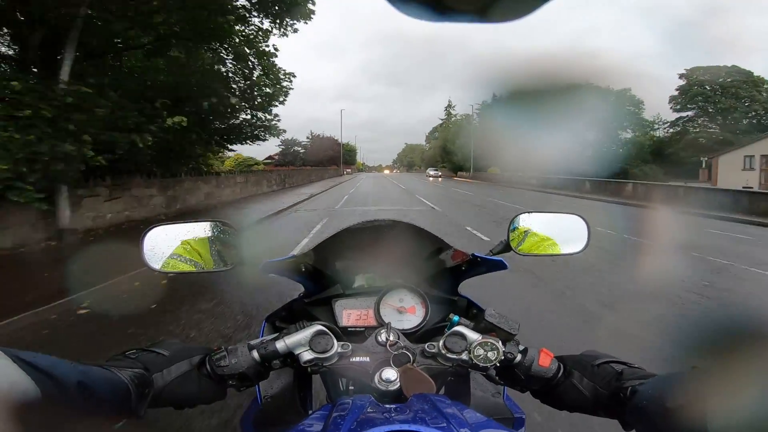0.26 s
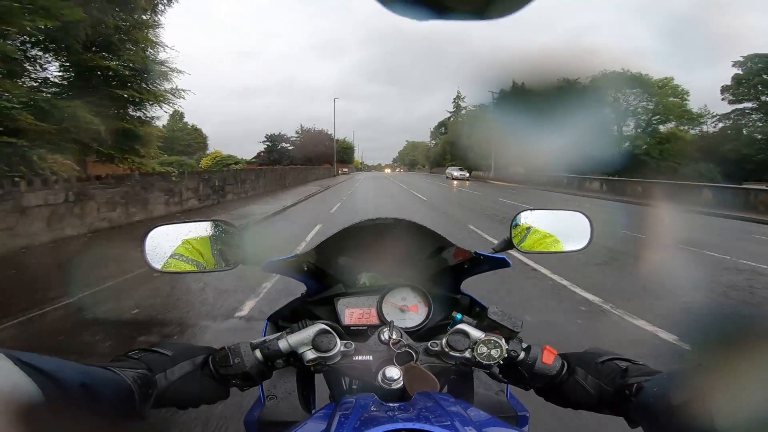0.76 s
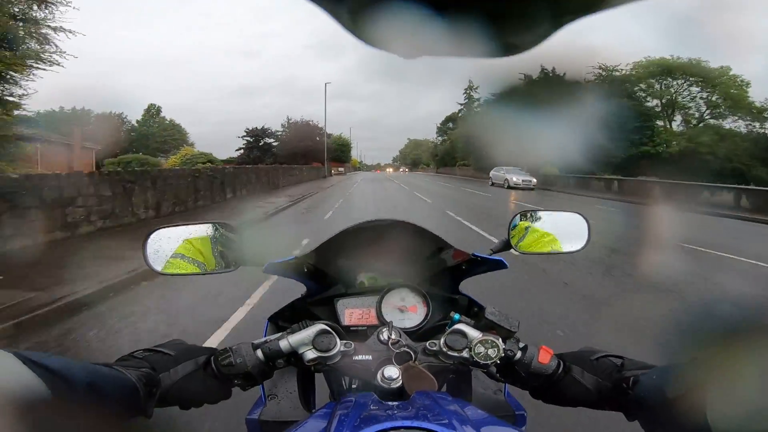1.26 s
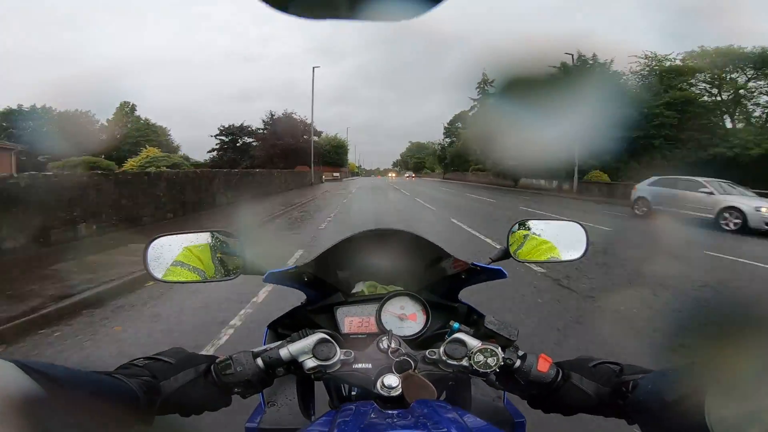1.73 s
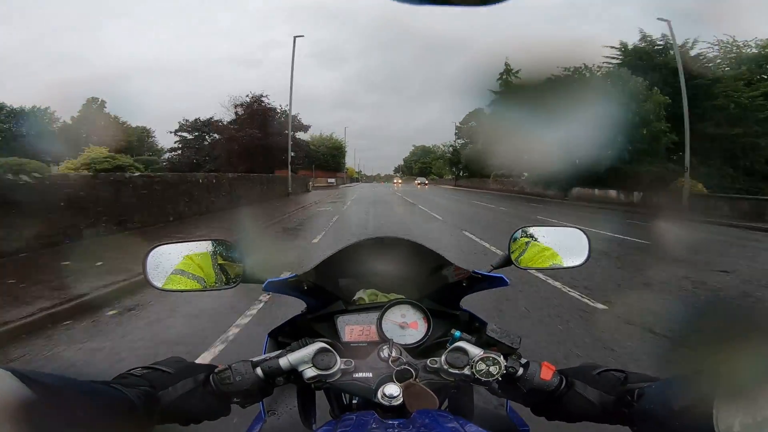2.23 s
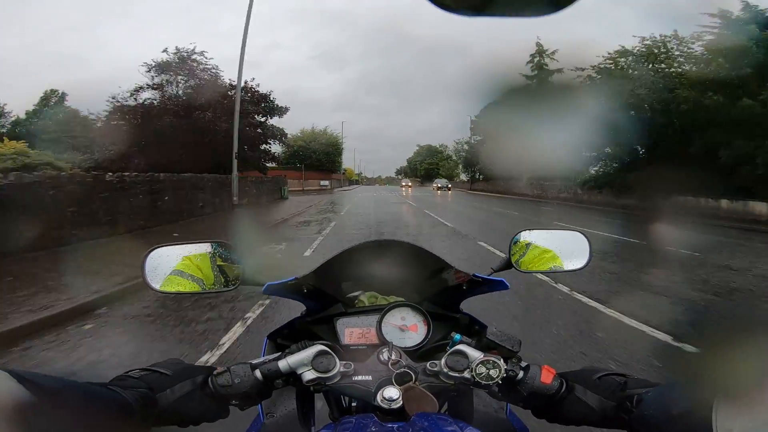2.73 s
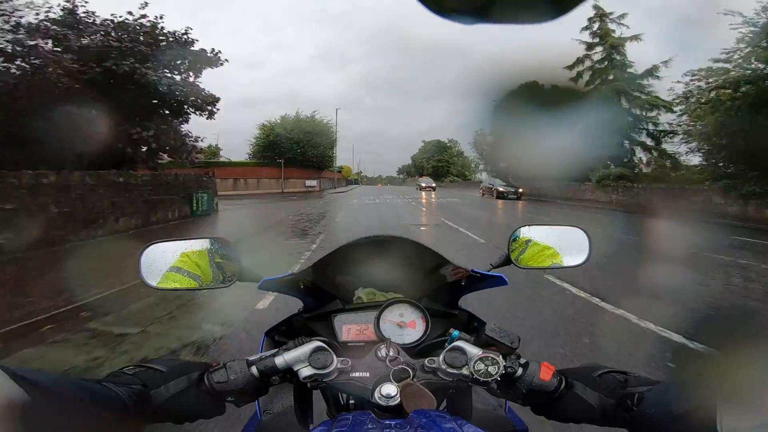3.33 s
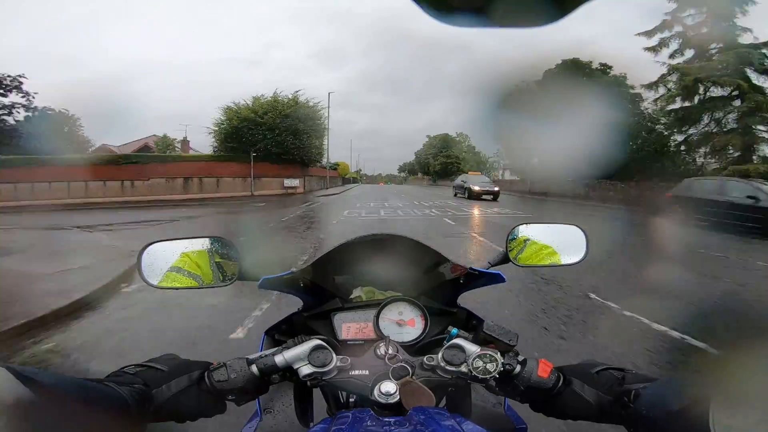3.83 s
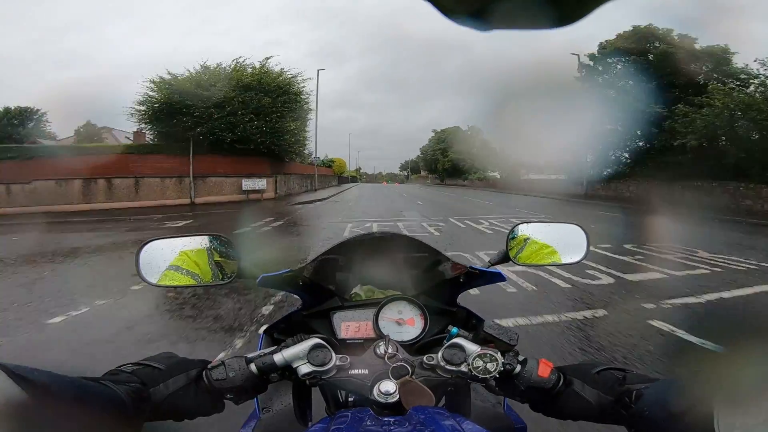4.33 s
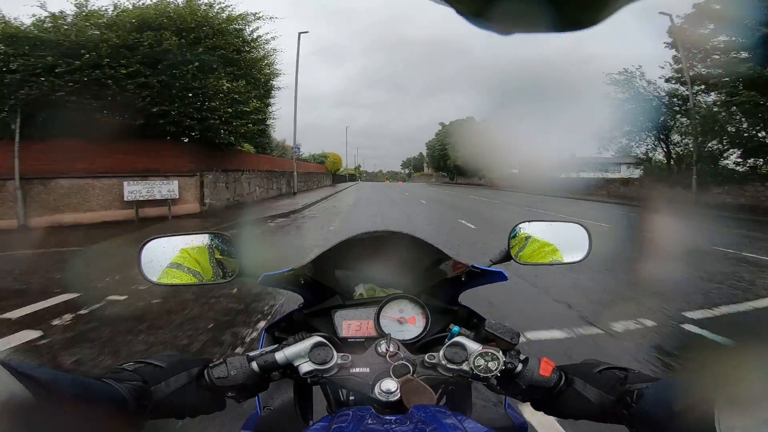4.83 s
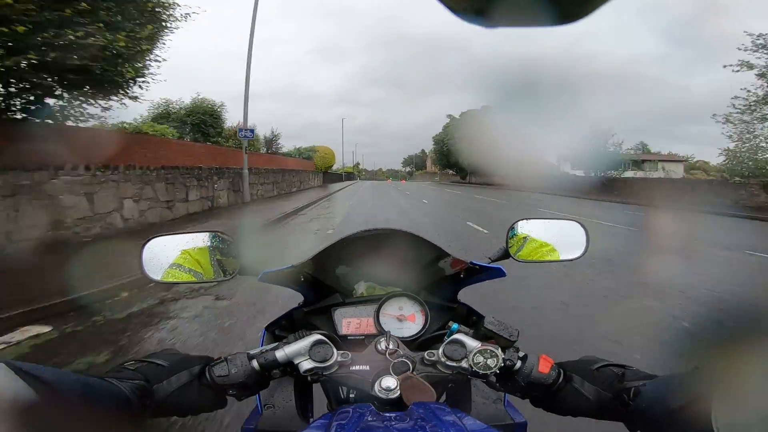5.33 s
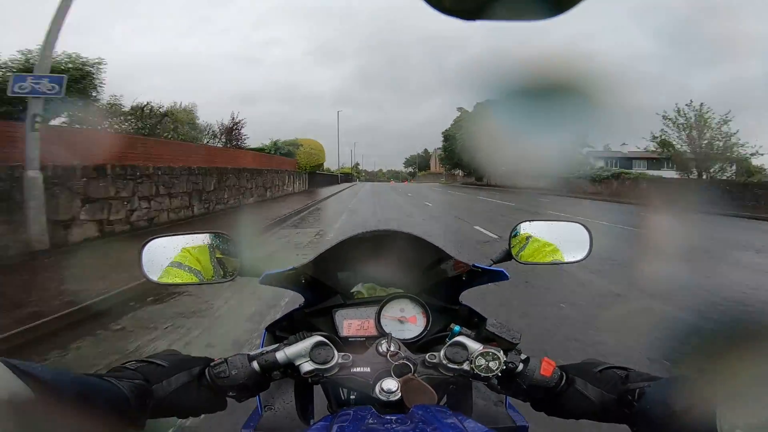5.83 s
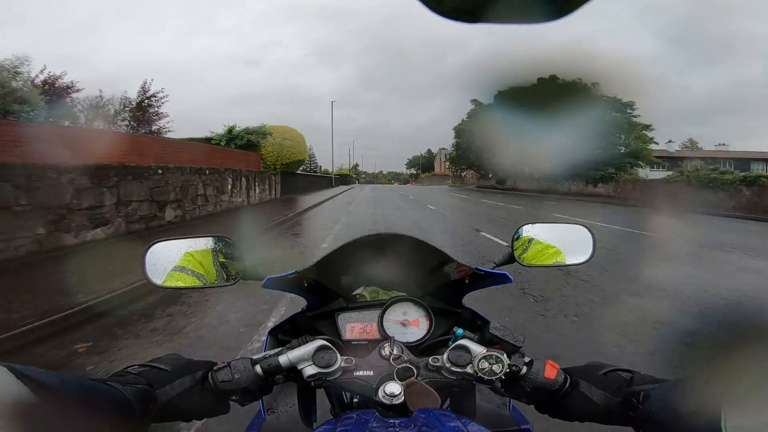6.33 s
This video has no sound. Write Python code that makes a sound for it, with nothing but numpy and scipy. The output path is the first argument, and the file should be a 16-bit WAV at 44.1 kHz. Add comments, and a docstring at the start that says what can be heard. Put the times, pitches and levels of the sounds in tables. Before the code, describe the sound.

A motorcycle cruises along a wet road under gusty wind buffeting, with spray, a few raindrop ticks and cars swishing past.

```python
"""Wind thumps and tears at a microphone on a rider's chest, over a motorcycle's throb and wet tyre hiss.
The windscreen sheds the eddies: gusts, sharp slaps, rasping jets and, now and then, a deep boom.
Underneath, the single cylinder fires a little slower as the bike loses speed. Water sizzles over the
microphone port, a few raindrops tick on the camera, and three oncoming cars swish past."""
import sys
import numpy as np
from scipy import signal
from scipy.fft import rfft, irfft, next_fast_len
from scipy.io import wavfile
from scipy.ndimage import uniform_filter1d, map_coordinates

SR = 44100
rng = np.random.default_rng(int(sys.argv[2]) if len(sys.argv) > 2 else 0)


def to_wav(s):
    """Save 16-bit WAV."""
    ch = np.atleast_2d(s).T  # columns
    pcm = np.round(np.clip(ch, -1, 1) * 32767)  # PCM
    wavfile.write(sys.argv[1], SR, pcm.astype(np.int16))


N = 290178
T = np.arange(N) / SR

# Cue levels are faders, set ahead of each layer's trim and filters.
# gusts spilling over the screen: t/s, length/s, buffet level/dB, tear level/dB, swell level/dB
GUST_CUES = [(0.005, 0.13, -15, -25, -20.5), (0.154, 0.11, -15.5, -44, -27), (0.28, 0.034, -14, -41, -35),
             (0.363, 0.088, -18, -29.5, -30), (0.463, 0.11, -13.5, -26, -24), (0.572, 0.033, -13, -25, -29),
             (0.618, 0.14, -15.5, -23, -23), (0.763, 0.029, -13, -24.5, -26), (0.821, 0.03, -10, -25, -29),
             (0.943, 0.044, -11, -27, -35), (1.01, 0.087, -12, -21.5, -36), (1.136, 0.053, -16.5, -30, -47),
             (1.358, 0.052, -16, -30, -33), (1.469, 0.15, -15, -30, -21), (2.066, 0.021, -10, -25, -46),
             (2.139, 0.047, -10.5, -35, -31), (2.26, 0.042, -15, -26, -39), (2.329, 0.099, -18, -30.5, -27),
             (2.497, 0.093, -14.5, -26, -21), (2.635, 0.041, -13, -33, -39),
             (2.729, 0.059, -16, -26.5, -39), (2.805, 0.022, -13, -36, -30),
             (2.852, 0.042, -16, -25.5, -20), (2.974, 0.067, -20, -30.5, -27), (3.085, 0.1, -16, -22, -22),
             (3.232, 0.023, -14, -22.5, -12), (3.283, 0.02, -15.5, -31, -32),
             (3.354, 0.054, -17.5, -33, -19), (3.464, 0.053, -16.5, -38, -30), (3.78, 0.06, -18, -31, -32),
             (3.883, 0.17, -14.5, -30, -29), (4.051, 0.045, -21, -23.5, -28),
             (4.151, 0.27, -16, -27.5, -21), (4.596, 0.084, -13.5, -35, -24), (4.752, 0.027, -11, -46, -45),
             (4.8, 0.035, -17, -34, -30), (4.842, 0.029, -18, -22, -21), (4.94, 0.076, -19.5, -41, -32),
             (5.019, 0.062, -16, -22.5, -31), (5.087, 0.12, -17.5, -25.5, -31),
             (5.223, 0.031, -14, -22, -26), (5.299, 0.084, -14.5, -23.5, -25),
             (5.385, 0.098, -22.5, -25, -29), (5.5, 0.14, -18.5, -32, -19.5),
             (5.647, 0.062, -18.5, -34, -23), (5.725, 0.096, -16, -26.5, -36),
             (5.84, 0.067, -15.5, -25, -19), (5.993, 0.033, -19, -39, -41), (6.08, 0.056, -22.5, -21, -25),
             (6.194, 0.19, -22.5, -30, -43), (6.378, 0.13, -23, -27.5, -38), (6.492, 0.12, -22, -24.5, -33)]
# wind bed between gusts, lowest in the screen's shelter: t/s, level/dB
CALM_FADER = [(0, -0.5), (1.1, -2), (1.25, -2), (1.65, -7), (2.02, -6.5), (2.25, 1), (3.45, -4.5),
              (3.65, -3), (3.85, -2.5), (4.4, -1), (4.52, -0.5), (4.7, -4), (5.9, 0), (6.58, -1.5)]
# tone of the wind's thumping buffet, slow pressure swell and fine tearing: f/Hz, level/dB
BUFFET_EQ = [(30, -9.5), (55, -0.5), (80, -1), (125, -0.5), (190, -5), (290, -12), (450, -20), (900, -34.5),
             (2500, -63)]
SWELL_EQ = [(10, -21.5), (24, 1), (38, 17.5), (55, 11), (80, 5.5), (160, -55), (600, -120)]
TEAR_EQ = [(120, -15), (280, -1), (420, 2), (650, -3), (1100, -6), (1600, -25), (2500, -20), (4000, -37),
           (8000, -70.5), (14000, -100)]
# four-stroke firing rate: t/s, f/Hz
FIRING_RATE = [(0, 37.7), (1.1, 37.5), (1.8, 37.25), (2.4, 36.6), (3.1, 36.1), (3.7, 35.7), (4.7, 35.15),
               (5.4, 34.7), (6, 34.3), (6.58, 34.35)]
# exhaust note at the highest and the lowest revs: multiple of the firing rate, level/dB
ORDERS_FAST = [(1, -12), (2, 3), (3, -7), (4, -15), (5, -3.5), (6, -13), (7, -17.5), (8, -30), (9, -16),
               (10, -13.5), (11, -22), (12, -19.5), (13, -25)]
ORDERS_SLOW = [(1, -9.5), (2, -0.5), (3, -6.5), (4, -0.5), (5, -4), (6, -4.5), (7, -5), (8, -14), (9, -21),
               (10, -10.5), (11, -18.5), (12, -17.5), (13, -20)]
# rides on the engine, the tyre roar and the spray (up where the road is wetter): t/s, level/dB
ENGINE_FADER = [(0, -23), (1.8, -22.5), (3.6, -24), (4.6, -23), (6.58, -21.5)]
ROAR_FADER = [(0, -31.5), (0.9, -32), (1.25, -34), (2, -31), (2.8, -29), (3.2, -27.5), (4.3, -26.5),
              (5.55, -31.5), (6.45, -27)]
SPRAY_FADER = [(0, -44.5), (0.35, -46), (0.75, -46.5), (1.3, -46.5), (1.7, -44.5), (2.02, -44), (2.25, -46),
               (2.8, -45.5), (3.2, -44), (3.55, -45), (4.2, -44), (4.55, -45.5), (5.3, -45), (5.75, -45.5),
               (6.1, -45), (6.38, -42), (6.58, -44)]
# tone of the bike's tread and of its spray: f/Hz, level/dB
ROAR_EQ = [(100, -0.5), (300, 0), (550, -2.5), (780, 3), (1150, 2), (1370, -0.5), (1550, -8), (2300, -10),
           (3300, -18), (4000, -32), (7000, -61), (12000, -120)]
SPRAY_EQ = [(1500, -4), (3300, 6), (3900, -1.5), (4600, 1.5), (4900, -1.5), (5220, 4), (5500, -1),
            (5850, -3.5), (6250, -3.5), (6700, -6.5), (8100, -6), (8900, -18.5), (9900, -23), (10400, -22),
            (11500, -30.5), (14000, -41)]
# early reflections off nearby surfaces: delay/s, level/dB
REFLECTIONS = [(.0034, -43), (.0049, -44), (.0076, -24.5), (0.0102, -20)]
# water creeping over the microphone port: t/s, level/dB, half length/s, f/Hz, glide/(Hz/s)
FILM_CUES = [(0.08, -55, 0.19, 8800, -3000), (0.07, -49.5, 0.15, 7000, 5999), (0.3, -53, 0.16, 5700, -3500),
             (1.2, -58, 0.037, 8100, -2000), (3.2, -56, 0.07, 8300, -4000)]
# single vortices hitting the microphone: t/s, level/dB, core passing time/s
SLAP_CUES = [(0.1233, -7, 0.00064), (.202, -6.5, .0012), (.247, -9, 0.0013), (.386, -10, .00035),
             (0.4105, -7, .0006), (.475, -13, .0004), (0.4875, -10, .0006), (.535, -8.5, 0.0014),
             (.547, -9.5, 0.00053), (0.5865, -8, 0.0005), (0.6383, -8.5, 0.00058), (.6871, -13, .0005),
             (.6945, -9, 0.00041), (0.721, -11, 0.00089), (0.7341, -10, 0.00055), (.779, -9.5, 0.00081),
             (0.9679, -6, 0.00057), (0.9795, -4.5, 0.00086), (1.0104, -5, 0.00056), (1.0267, -9.5, .0007),
             (1.0666, -15, 0.00063), (1.0834, -8, 0.00068), (1.0917, -1, .0009), (1.165, -12, 0.0012),
             (1.5296, -8, 0.00041), (1.5438, -8.5, 0.00042), (1.5781, -10.5, 0.00084), (1.617, -8.5, 0.002),
             (2.0815, -7.5, 0.0012), (2.09, -2.5, 0.0016), (2.0965, -2.5, 0.0015), (2.1507, -10, 0.00049),
             (2.1798, -4, 0.00059), (2.259, -6, 0.00043), (2.36, -13, .0014), (2.461, -8.5, 0.001),
             (2.5021, -8, 0.00042), (2.516, -12, 0.0003), (2.537, -7, 0.0015), (2.646, -9, .0015),
             (2.7465, -11, 0.0004), (2.772, -6.5, .0012), (2.869, -9.5, 0.0012), (2.896, -7.5, 0.0013),
             (3.0717, -10.5, 0.00035), (3.138, -11, 0.00077), (3.243, -9, 0.0014), (3.301, -7, 0.0016),
             (3.363, -9, 0.0015), (3.3908, -5.5, 0.00044), (3.466, -8, 0.0014), (3.5094, -6, 0.00084),
             (3.703, -6.5, 0.0019), (3.7573, -5, 0.00048), (3.829, -10, .0011), (3.912, -6.5, .001),
             (3.937, -10.5, .001), (4.0007, -8.5, 0.00044), (4.025, -8, 0.0013), (4.0492, -5, 0.00032),
             (4.061, -10, 0.0013), (4.21, -13, 0.001), (4.262, -8.5, .0012), (4.355, -10, 0.0012),
             (4.675, -6, .0013), (4.754, -8.5, 0.0013), (4.828, -11, 0.0013), (4.9678, -10, 0.00061),
             (5.0141, -5.5, 0.00037), (5.0217, -15, 0.00048), (5.052, -11, 0.0007), (5.127, -10, .0013),
             (5.1605, -13, 0.0008), (5.3047, -11, 0.00086), (5.3272, -9, 0.00079), (5.3525, -8.5, 0.00048),
             (5.3944, -8, 0.00035), (5.454, -10, 0.00061), (5.518, -9, 0.0011), (5.554, -11.5, 0.00095),
             (5.5956, -8.5, 0.00078), (5.664, -7, 0.00097), (5.79, -7.5, 0.0013), (5.9993, -12.5, 0.00061)]
# raindrops on the camera: t/s, level/dB, f/Hz
DROP_CUES = [(0.275, -15.5, 2450), (.276, -21.5, 4600), (.277, -31, 8000), (.7075, -18, 2000),
             (.7085, -22, 3880), (1.067, -25, 3830), (1.1452, -23, 7960), (1.1798, -33, 7000),
             (1.6897, -36, 8200), (1.861, -16.5, 2280), (2.4983, -34, 7500), (3.1883, -16.5, 7300),
             (3.3264, -17.5, 4200), (4.2416, -22, 7400), (4.3127, -34, 8000), (4.4483, -26, 8160),
             (4.868, -22, 4130), (6.0253, -21.5, 6900)]
# fast jets across the microphone: t/s, level/dB, half length/s, centre f/Hz
RASP_CUES = [(0.483, -26, 0.029, 850), (0.589, -26.5, 0.0067, 1400), (0.642, -32, 0.035, 800),
             (0.696, -25, 0.019, 900), (0.875, -34, 0.07, 1400), (1.033, -32, 0.0096, 900),
             (1.068, -29, 0.02, 1300), (1.179, -25, 0.0083, 1350), (1.531, -25, 0.0046, 1000),
             (1.545, -24, 0.009, 1040), (3.135, -28, 0.026, 750), (4.035, -34, 0.037, 900),
             (4.194, -27.5, 0.025, 840), (4.447, -29.5, .009, 2100), (5.014, -24, .006, 940),
             (5.047, -26, .02, 880), (5.155, -31.5, 0.078, 780), (5.414, -28, 0.012, 950)]
# spells of deep vortices: t/s, level/dB, half length/s
BOOM_CUES = [(1.038, -19, 0.08), (2.223, -18.5, 0.11), (3.2, -22, 0.29), (5.174, -18, 0.35),
             (5.7, -22.5, 0.078)]
# oncoming cars at their loudest: t/s, level/dB, half length/s
CAR_CUES = [(1.914, -37, 0.48), (3.78, -32, 0.26), (4.4, -46, 0.29)]
# tone of their wet tyres: f/Hz, level/dB
CAR_EQ = [(200, -6), (900, 0.5), (1300, 0.5), (1700, 2.5), (2500, -1), (3300, -11.5), (4200, -18.5),
          (8000, -26), (14000, -85)]
# tone of the saturated eddies, engine clatter, vortex wakes and booms: f/Hz, level/dB
EDDY_EQ = [(20, -13.5), (50, -2.5), (500, -1.5), (1200, -24.5), (4000, -59), (9000, -120)]
CLATTER_EQ = [(300, -19.5), (800, -3.5), (1300, -1), (2600, -5), (5000, -28.5), (10000, -57.5)]
WAKE_EQ = [(150, -7.5), (400, 0.5), (1000, -3), (1500, -14.5), (2500, -22), (5000, -46.5)]
BOOM_EQ = [(40, -29.5), (70, -7), (88, -3), (105, -5), (135, -21.5), (300, -71), (800, -120)]


def amp(db):
    """Decibels to gain."""
    return 10 ** (np.asarray(db) / 20)


def unit(x):
    """Normalise to rms 1."""
    return x / np.sqrt(np.mean(x ** 2) + 1e-20)


def automation(points):
    """Straight ramps through (time, value) points, one value a sample."""
    return np.interp(T, *np.transpose(points))


def bell(centre_s, half_s):
    """A bell-shaped fade in and out."""
    return np.exp(-((T - centre_s) / half_s) ** 2)


def wobble(rate_hz):
    """A smooth random modulator with rate_hz knots a second."""
    return map_coordinates(rng.standard_normal(int(N * rate_hz / SR) + 4), [T * rate_hz])


def filtered(x, response):
    """Filter x by a gain given as a function of frequency."""
    size = next_fast_len(N + 8192)
    return irfft(rfft(x, size) * response(np.fft.rfftfreq(size, 1 / SR)), size)[:N]


def equalised(x, eq):
    """x through an EQ curve, at rms 1."""
    f, db = np.transpose(eq)
    return unit(filtered(x, lambda hz: amp(np.interp(np.log(hz + 1), np.log(f), db))))


def noise(eq):
    """Fresh noise through an EQ curve, at rms 1."""
    return equalised(rng.standard_normal(N), eq)


def add(track, s, sound):
    """Mix a one-shot into a track at time s."""
    part = track[max(round(s * SR), 0):][:len(sound)]
    part += sound[:len(part)]


def gust_envelope(levels_db, calm_db, attack_s, release_s):
    """Each gust rises out of the wind bed, holds and lets go."""
    t = np.arange(0, N, 16) / SR
    gain = np.zeros(len(t))
    for (start, length, *_), db in zip(GUST_CUES, levels_db):
        fade_in = (1 + np.tanh((t - start) / attack_s / 2)) / 2
        fade_out = (1 + np.tanh((start + length - t) / release_s / 2)) / 2
        gain += amp(db) * fade_in * fade_out
    return np.hypot(np.interp(T, t, gain), amp(calm_db + automation(CALM_FADER)))


def wind(buffet_trim_db=-2.3, flap_db=1.5, surge_db=1.1, lump_db=4.0, coupling=0.73):
    """Large eddies thump; the fine turbulence they carry tears in step with their pressure."""
    _, _, buffet_db, tear_db, swell_db = np.transpose(GUST_CUES)
    # saturation: the speed of the flow caps an eddy's pressure
    eddies = equalised(np.tanh(0.71 * noise(BUFFET_EQ)), EDDY_EQ)
    # the screen's wake flaps on and off the microphone
    flapping = unit(amp(flap_db * np.tanh(wobble(34))))
    surges = unit(amp(surge_db * wobble(55)))
    buffet = gust_envelope(buffet_db + buffet_trim_db, calm_db=-24, attack_s=0.0024, release_s=0.0086)
    swell = gust_envelope(swell_db, calm_db=-34, attack_s=0.027, release_s=0.027)
    tear = gust_envelope(tear_db, calm_db=-35.5, attack_s=0.017, release_s=0.018)
    rumble = noise(SWELL_EQ)
    lumps = np.exp(coupling * np.tanh(eddies)) * amp(lump_db * np.tanh(wobble(110)))
    turbulence = equalised(rng.standard_normal(N) * lumps, TEAR_EQ)
    return swell * rumble + surges * (flapping * buffet * eddies + tear * turbulence)


def engine(rev_jitter=0.0019, flutter_db=0.84, clatter_db=-19):
    """One firing every two crank turns: a stack of orders, with valve and gas clatter on each turn."""
    firing_hz = automation(FIRING_RATE)
    cycles = np.cumsum(firing_hz * (1 + rev_jitter * wobble(20))) / SR
    # crossfade the tone: as the revs sink, other orders land on the pipe's resonances
    revs = (firing_hz - firing_hz.min()) / np.ptp(firing_hz)
    exhaust = np.zeros(N)
    for (order, fast_db), (_, slow_db) in zip(ORDERS_FAST, ORDERS_SLOW):
        gain = amp(revs * fast_db + (1 - revs) * slow_db + flutter_db * wobble(12))
        exhaust += gain * np.sin(2 * np.pi * (order * cycles + rng.random()))
    crank_pulse = (0.5 + 0.5 * np.cos(2 * np.pi * 2 * cycles)) ** 2
    clatter = unit(crank_pulse * noise(CLATTER_EQ))
    return amp(automation(ENGINE_FADER)) * (unit(exhaust) + amp(clatter_db) * clatter)


def reflected(x):
    """Tank, screen and road each send back a weak copy: a light comb filter."""
    def comb(hz):
        return 1 + sum(amp(db) * np.exp(-2j * np.pi * hz * delay) for delay, db in REFLECTIONS)
    return unit(filtered(x, comb))


def patchy(x, depth_db):
    """Turbulent air lets narrow patches of a hiss swell and sink."""
    bands = signal.stft(x, nperseg=1024)[2]
    patches = uniform_filter1d(rng.standard_normal(bands.shape), size=5, axis=0)  # smear in frequency
    patches = unit(uniform_filter1d(patches, size=6, axis=1))  # and in time
    return unit(signal.istft(bands * amp(depth_db * patches), nperseg=1024)[1][:N])


def tyres(roar_trim_db=0.74, spray_trim_db=1.57, waver_db=0.69, fizz_db=1.5, surge_db=0.45):
    """Tread roars on the asphalt and throws up a grainy spray that lifts on wetter stretches."""
    roar_gain = amp(automation(ROAR_FADER) + roar_trim_db + waver_db * wobble(25))
    roar = patchy(reflected(noise(ROAR_EQ)), depth_db=1.34)
    droplets = rng.standard_normal(N) * amp(fizz_db * wobble(900))
    spray_gain = amp(automation(SPRAY_FADER) + spray_trim_db + surge_db * wobble(11))
    spray = reflected(equalised(droplets, SPRAY_EQ))
    return roar_gain * roar + spray_gain * spray


def water_films(trim_db=-1, width_hz=1800):
    """Air sizzles through a film of water in broad resonances that glide as the film creeps."""
    band = wobble(width_hz) + 1j * wobble(width_hz)
    sizzle = np.zeros(N)
    for s, db, half, hz, glide in FILM_CUES:
        centre_hz = hz + glide * np.clip(T - s, -2 * half, 2 * half)
        carrier = np.exp(2j * np.pi * np.cumsum(centre_hz) / SR)
        sizzle += amp(db + trim_db) * bell(s, half) * unit((band * carrier).real)
    return sizzle


def vortex_slaps(port_hz=2400, wake_db=-14.5, wake_decay_s=0.0029):
    """A vortex core hits as one pressure spike, snappier the tighter it is, with a turbulent tail."""
    spikes, wake_envelope = np.zeros(N), np.zeros(N)
    t = np.arange(SR // 10) / SR
    middle = t.mean()
    for s, db, passing_s in SLAP_CUES:
        offset = (t - middle) / passing_s
        spike = (1 - offset ** 2) / (1 + offset ** 2) ** 2
        add(spikes, s - middle, rng.choice([-1, 1]) * amp(db) * spike)
        add(wake_envelope, s, amp(db + wake_db) * np.exp(-t / wake_decay_s))
    wakes = wake_envelope * noise(WAKE_EQ)
    return filtered(spikes + wakes, lambda hz: 1 / (1 + (hz / port_hz) ** 4))


def raindrops(trim_db=-0.5, decay_cycles=1.08, splash_db=-25, splash_decay_s=0.011, splash_width=0.28):
    """A drop lands as a tick of a few cycles, then a brief splash around the same pitch."""
    hits = np.zeros(N)
    t = np.arange(SR // 8) / SR - 0.001  # room for the tick's attack
    bins_hz = np.fft.rfftfreq(len(t), 1 / SR)
    for s, db, hz in DROP_CUES:
        tick = np.exp(-(t * hz / decay_cycles) ** 2) * np.sin(2 * np.pi * hz * t)
        band = np.exp(-((bins_hz / hz - 1) / splash_width) ** 2)
        hiss = unit(irfft(rfft(rng.standard_normal(len(t))) * band, len(t)))
        splash = hiss * np.exp(-t / splash_decay_s) * (t > 0)
        add(hits, s, amp(db + trim_db) * (tick + amp(splash_db) * splash))
    return filtered(hits, lambda hz: 1 / (1 + (hz / 10200) ** 20))  # steep high cut


def jet_rasps(crackle_db=3.0, crackle_hz=220, port_hz=2200):
    """A fast jet breaks into a short, crackling hiss, brighter than the gust around it."""
    jets = np.zeros(N)
    for s, db, half, centre_hz in RASP_CUES:
        def band(hz):
            return (hz / centre_hz) ** 2 / (1 + (hz / centre_hz) ** 4) / (1 + (hz / port_hz) ** 6)
        grains = rng.standard_normal(N) * amp(crackle_db * np.tanh(wobble(crackle_hz)))
        jets += amp(db) * bell(s, half) * unit(filtered(grains, band))
    return jets


def vortex_booms():
    """In spells the screen sheds large vortices at a nearly steady rate: a narrow band of bass."""
    envelope = sum(amp(db) * bell(s, half) for s, db, half in BOOM_CUES)
    return envelope * noise(BOOM_EQ)


def passing_cars():
    """Each car's wet tyres swell as it nears and fade as it leaves."""
    nearness = sum(amp(db) / (1 + ((T - s) / half) ** 2) for s, db, half in CAR_CUES)
    return nearness * reflected(noise(CAR_EQ))


def scene():
    """All layers sum to mono at one microphone."""
    motor = engine()
    air = wind() + vortex_booms() + vortex_slaps() + jet_rasps()
    wet_road = tyres() + water_films() + passing_cars() + raindrops()
    return (motor + air + wet_road)[None]


def record(dry, ceiling=0.85, high_cut_hz=15600):
    """The microphone soft-clips the hardest gusts; the camera cuts everything above its band limit."""
    rounded = dry[0] / (1 + (dry[0] / ceiling) ** 6) ** (1 / 6)
    return filtered(rounded, lambda hz: hz < high_cut_hz)[None]


dry = scene()
out = record(dry)
to_wav(out)
```